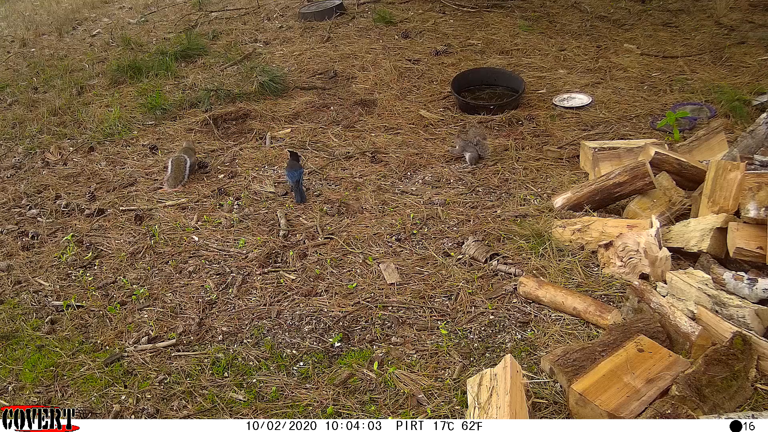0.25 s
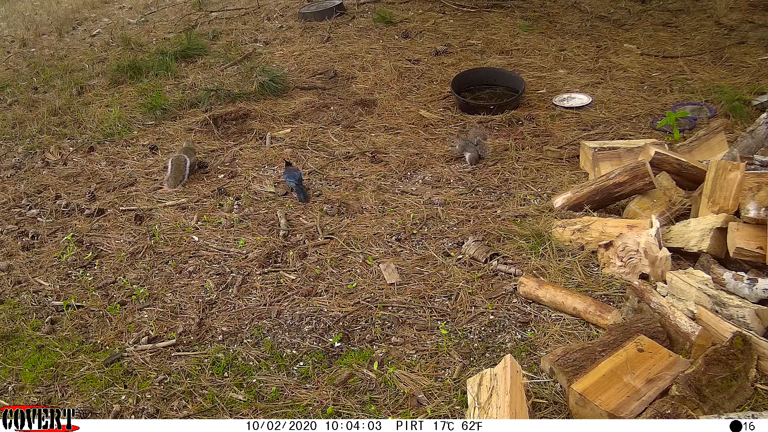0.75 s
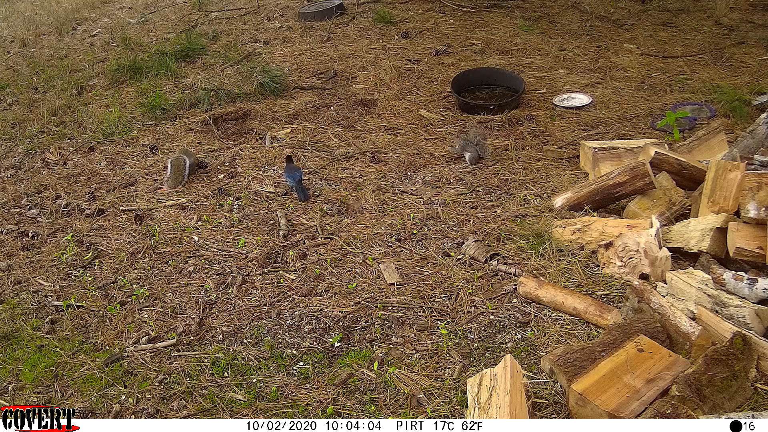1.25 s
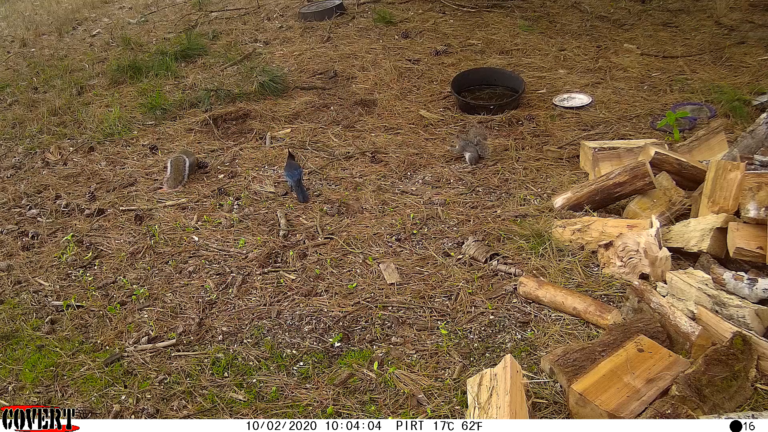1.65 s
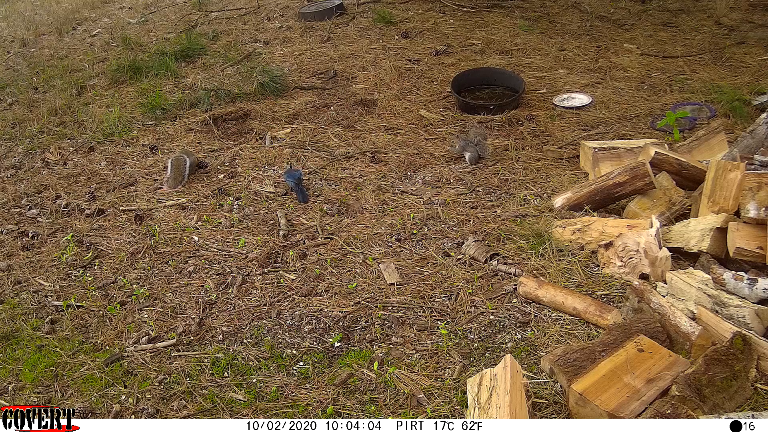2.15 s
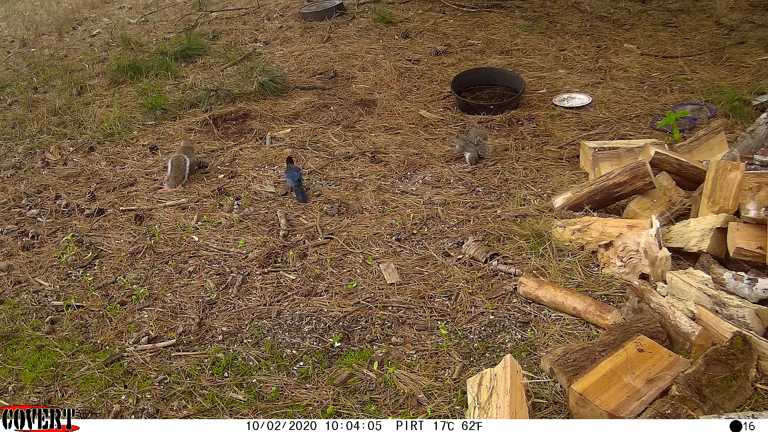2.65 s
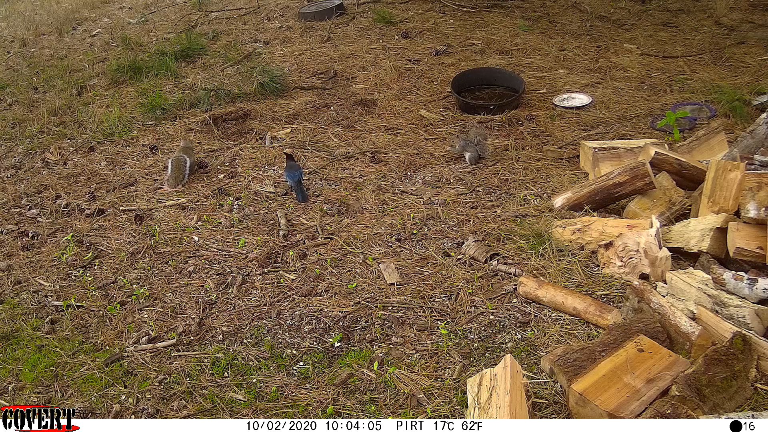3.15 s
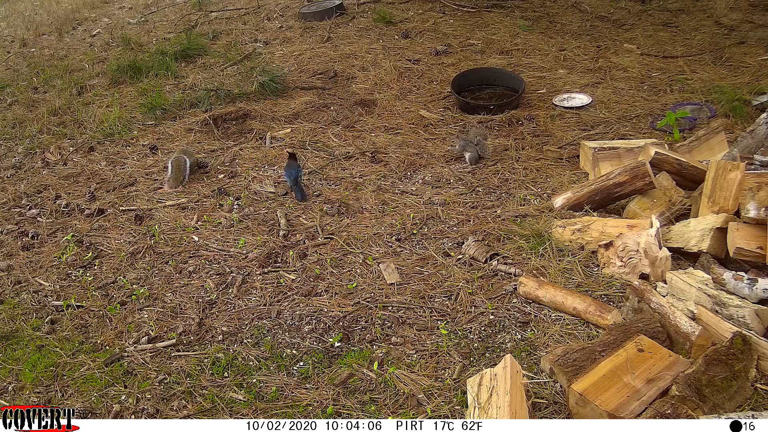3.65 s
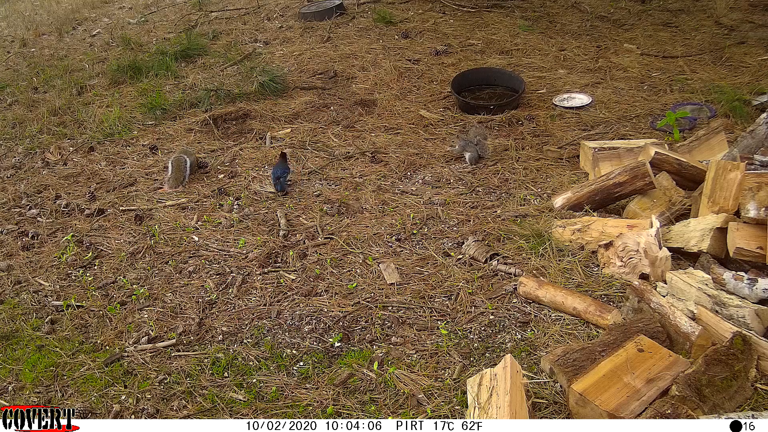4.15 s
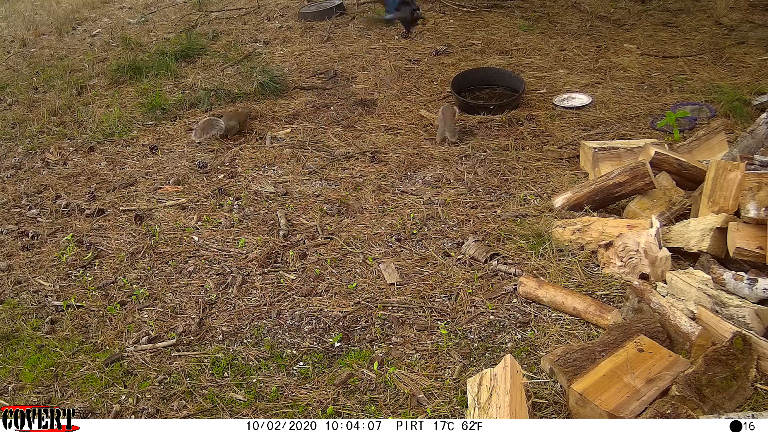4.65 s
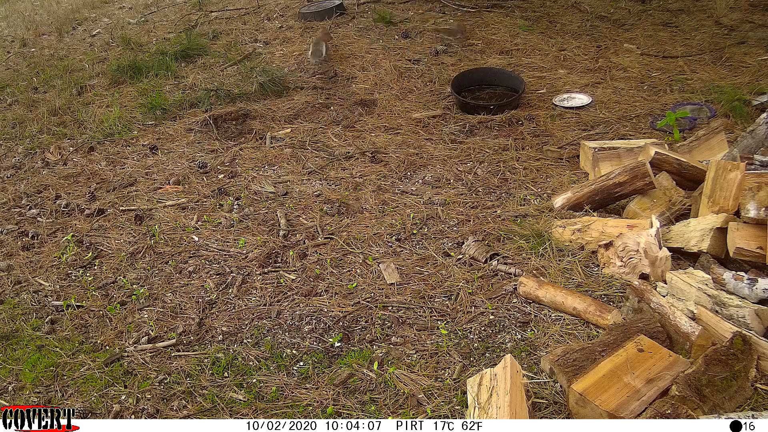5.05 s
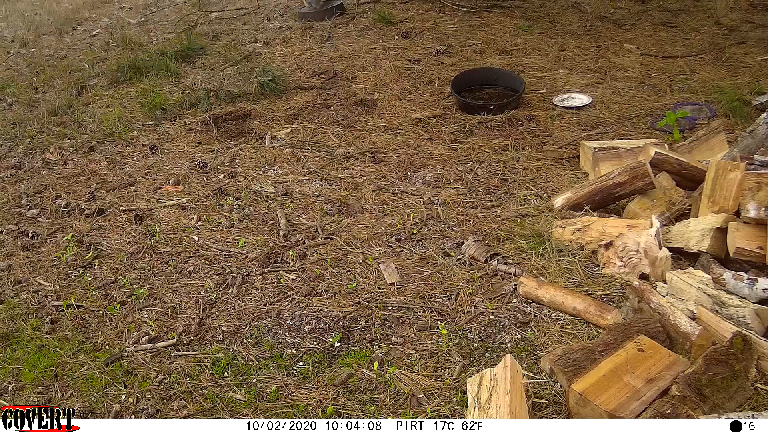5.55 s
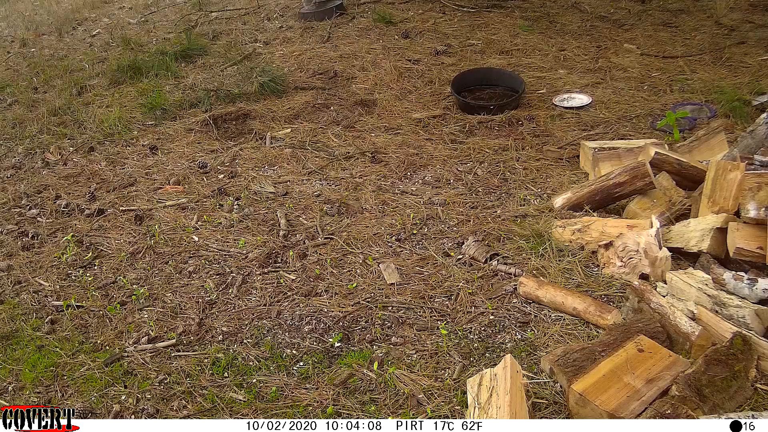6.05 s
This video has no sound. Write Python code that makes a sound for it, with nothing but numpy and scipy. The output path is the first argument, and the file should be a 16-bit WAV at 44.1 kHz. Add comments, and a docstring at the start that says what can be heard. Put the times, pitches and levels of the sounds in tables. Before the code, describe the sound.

Low hiss with faint wavering whines, heard from a small box outdoors. Distant hoarse bird calls and a thin whistle come first, then short bright chirps and tiny snaps on the ground. After a few quick mews, squawks crowd together and dry needles rush and crackle. A very close hollow thump and rapid claw scratching dominate briefly, dropping away to far calls with slight woodland echo and light rustling.

```python
"""A wooded yard, the microphone at a small box: a quiet hiss with faint wavering whines lies over everything.
Far among the trees, harsh jay calls (pulsed noise in throat resonances) and a thin whistle; nearer, arched
chirps and soft mews (phase-swept sines). Broadband hiss swells briefly, at times along with the calls. A jay
takes off and squirrels scatter: grains of noise rustle and snap in dry needles. One animal lands on the box, a
bank of decaying modes that knocks hollowly; its claws tick and scrabble. Far calls carry the most echo."""
import sys
import numpy as np
from scipy import signal
from scipy.fft import rfft, irfft, next_fast_len
from scipy.io import wavfile
from scipy.ndimage import uniform_filter1d

SR = 44100
rng = np.random.default_rng(int(sys.argv[2]) if len(sys.argv) > 2 else 0)


def to_wav(sig):
    """Store sig (one row per channel, or 1-D mono) as 16-bit WAV at the path in sys.argv[1].

    Samples outside -1..1 are clipped; the rate is SR.
    """
    pcm = np.clip(np.atleast_2d(sig), -1, 1) * 32767
    pcm = np.round(pcm).astype(np.int16)
    wavfile.write(sys.argv[1], SR, pcm.T)  # frames by channels


N = 277389
TIME = np.arange(N) / SR


def from_db(db):
    """Decibels to amplitude."""
    return 10 ** (np.asarray(db) / 20)


def rms_one(x):
    """Scale a signal to rms 1."""
    return x / np.sqrt(np.mean(x ** 2) + 1e-20)


def noise():
    """White noise for the whole scene."""
    return rng.standard_normal(N)


def level(rows):
    """Gain along a (t/s, level/dB) curve: practically silent before it, held after it."""
    s, db = np.transpose(rows)
    return from_db(np.interp(TIME, s, db, left=-140))


def add(out, start, sound):
    """Mix a sound in at a time in seconds, cut at the scene's edges."""
    at = int(round(start * SR))
    sound, at = sound[max(-at, 0):], max(at, 0)
    out[at:at + len(sound)] += sound[:max(N - at, 0)]


def colour(x, spectrum):
    """Filter a signal by a smooth (f/Hz, level/dB) curve; rms 1."""
    hz, db = np.transpose(spectrum)
    size = next_fast_len(len(x))
    f = np.fft.rfftfreq(size, 1 / SR) + 1  # 1 Hz up, so that the logarithm exists
    gain = from_db(np.interp(np.log(f), np.log(hz), db))
    return rms_one(irfft(rfft(x, size) * gain, size)[:len(x)])


def drift(rate):
    """Random wander through this many chance points a second, joined by lines; rms 1."""
    return rms_one(np.interp(TIME * rate, np.arange(40000), rng.standard_normal(40000)))


def resonate(x, hz, width_hz):
    """A two-pole resonance with unit gain on top."""
    r = np.exp(-np.pi * width_hz / SR)
    zeros = np.array([1, 0, -1]) * (1 - r * r) / 2
    poles = [1, -2 * r * np.cos(2 * np.pi * hz / SR), r * r]
    return signal.lfilter(zeros, poles, x)


def swell(u, edge):
    """A rounded rise and fall as u runs from 0 to 1; edge is the share of each slope."""
    return np.sin(np.pi / 2 * np.clip(np.minimum(u, 1 - u) / edge, 0, 1))


def during(start, length):
    """The samples that a call covers, and its progress from 0 to 1."""
    at = np.flatnonzero((TIME >= start) & (TIME < start + length))
    return at, (TIME[at] - start) / length


def sweep(hz):
    """Phase in radians of a tone that follows a pitch curve in Hz."""
    return 2 * np.pi * np.cumsum(hz) / SR


def grains(per_s, spread_db, smooth):
    """Tiny fractures of uneven size over a smooth friction hiss."""
    sizes = from_db(spread_db * np.minimum(rng.exponential(1, N), 4)) * rng.choice([-1, 1], N)
    return rms_one(sizes * (rng.random(N) < per_s / SR)) + smooth * noise()


# Spectrum of the steady hiss at the microphone: (f/Hz, level/dB)
HISS_SPECTRUM = [(15, -8), (30, -1.5), (60, -2.5), (137, -10.5), (400, -15.5), (750, -21), (1100, -13.5),
                 (1500, -19), (2200, -24.5), (3500, -26.5), (4200, -31), (5000, -28), (14000, -27.5),
                 (15800, -31.5)]
# Faint narrow whines in the hiss: (f/Hz, width/Hz, mean level/dB)
WHINES = [(4174, 180, -84), (6660, 360, -86.5), (8980, 200, -90)]
# Spectrum of the low lumps of air: (f/Hz, level/dB)
BUFFET_SPECTRUM = [(15, 0.5), (26, 1.5), (38, -4.5), (55, 0.5), (70, -6.5), (100, -12.5), (150, -22.5),
                   (260, -23), (500, -39), (1500, -92)]


def air(activity, hiss_db=-67, whine_flicker_db=3, calm_db=-73, gust_db=2.5,
        draught_db=-7.5, draught_power=0.79, smooth_s=0.13, lag_s=0.01):
    """Steady hiss, wavering whines, and low lumps that follow the rustle and drag levels by a power law."""
    hiss = from_db(hiss_db) * colour(noise(), HISS_SPECTRUM)
    whines = np.zeros(N)
    for hz, width_hz, db in WHINES:
        flicker = from_db(db + whine_flicker_db * drift(6.2))
        whines += flicker * rms_one(resonate(noise(), hz, width_hz))
    push = np.interp(TIME - lag_s, TIME, uniform_filter1d(activity, int(smooth_s * SR)))
    draught = from_db(draught_db) * np.abs(push) ** draught_power
    buffet = np.hypot(from_db(calm_db), draught) * from_db(gust_db * drift(7.3))
    return hiss + whines + buffet * colour(noise(), BUFFET_SPECTRUM)


# Harsh far calls: (t/s, length/s, main resonance f/Hz, its width/Hz, level/dB before the swell)
SQUAWKS = [(-.1, 0.22, 1140, 260, -74.5), (0.363, 0.33, 1130, 260, -68), (0.972, 0.25, 1115, 224, -62),
           (1.616, 0.45, 1095, 330, -70), (4.187, 0.25, 944, 151, -59.5), (4.441, 0.047, 1110, 149, -52.5),
           (4.555, 0.18, 1180, 397, -53), (4.705, 0.194, 1100, 376, -51.5), (5.039, 0.13, 1160, 400, -57.5),
           (5.487, 0.31, 1107, 272, -56.5), (5.775, 0.24, 1165, 404, -68.5), (6.02, 0.34, 1130, 238, -57)]
# Throat resonances: (multiple of the main f, multiple of its width, level/dB)
THROAT = [(1.001, 1, 8.5), (1.29, 1.5, 3), (1.4, .9, -42)]


def squawks(rasp_hz=95, rasp_depth=0.29, edge=0.39):
    """Hoarse calls: unevenly pulsed air through the throat resonances."""
    out = np.zeros(N)
    pulses = 1 + rasp_depth * np.sin(sweep(rasp_hz * (1 + 0.23 * drift(60))))
    breath = pulses * noise()
    for start, length, hz, width_hz, db in SQUAWKS:
        at, u = during(start, length)
        voice = 0
        for ratio, wider, gain_db in THROAT:
            # two passes make the skirts steeper
            once = resonate(breath[at], hz * ratio, width_hz * wider)
            twice = resonate(once, hz * ratio, width_hz * wider)
            voice = voice + from_db(gain_db) * rms_one(twice)
        out[at] += from_db(db) * swell(u, edge) * rms_one(voice)
    return out


# Notes of a far thin whistle: (t/s, length/s, top f/Hz, level/dB before the flutter)
WHISTLE = [(0.134, 0.2, 1680, -75), (.55, 0.32, 1812, -72), (0.867, 0.748, 1684, -66.5)]


def whistle(sag=0.033, waver=0.0048, flutter_db=4.0, edge=0.44):
    """Long, nearly pure, slightly arched notes that flutter on their way through the trees."""
    out, jitter, flutter = np.zeros(N), drift(150), from_db(flutter_db * drift(44.9))
    for start, length, hz, db in WHISTLE:
        at, u = during(start, length)
        arch = hz * (1 - sag * (2 * u - 1) ** 2)
        phase = sweep(arch * (1 + waver * jitter[at]))
        out[at] += from_db(db) * swell(u ** 0.77, edge) * flutter[at] * np.sin(phase)
    return out


# Nearer chirps: (t/s, length/s, top f/Hz of the lower voice, share of the note at which it tops,
# level/dB, upper voice level/dB and overtone level/dB relative to that)
CHIRPS = [(0.968, 0.038, 3500, 0.7, -65.5, -16, -18), (2.11, 0.053, 3600, 0.76, -66, -18, -7),
          (2.356, 0.08, 3410, 0.46, -56.5, -12, -27), (2.545, 0.089, 3410, 0.64, -51, -2.5, -3),
          (3.012, 0.083, 3250, 0.54, -63, -8, -22), (3.422, 0.071, 3440, 0.53, -49.5, -10, -20),
          (4.747, 0.06, 3500, 0.49, -47.5, -1, -6.5)]


def chirps(rise=0.7, fall=0.46, rough=0.021, wobble=0.012, upper_ratio=1.233, flutter_db=3.5):
    """Arched notes from both sides of a syrinx; the higher side and the overtones grow towards mid-note."""
    out, sway = np.zeros(N), 1 + wobble * drift(170)
    jitter = (drift(1300), drift(1300))
    flutter = from_db(flutter_db * np.array([drift(300), drift(200)]))
    for start, length, hz, crest, db, upper_db, overtone_db in CHIRPS:
        at, u = during(start, length)
        bend = np.where(u < crest, rise, fall) * (u - crest) ** 2
        arch = hz * sway[at] * (1 - bend)
        low, high = [sweep(arch * (1 + rough * j[at])) for j in jitter]
        high = high * upper_ratio
        push = swell(u ** 1.14, 0.54)  # effort builds slowly and lets go quickly
        overtones = np.sin(2 * low) + 0.68 * np.sin(low + high) + 0.5 * np.sin(2 * high)
        overtones += 0.21 * np.sin(3 * low) + 0.2 * np.sin(4 * low)
        lower = flutter[0, at] * np.sin(low)
        upper = from_db(upper_db) * push ** 2 * flutter[1, at] * np.sin(high)
        out[at] += from_db(db) * push * (lower + upper + from_db(overtone_db) * push * overtones)
    return out


# Brief swells of broadband hiss, some along with the calls: (peak t/s, length/s, level/dB)
HISS_SWELLS = [(1.063, .26, -69.5), (1.99, 0.27, -71.5), (2.192, 0.073, -57.5), (2.414, 0.15, -63.5),
               (2.568, .13, -62), (2.75, 0.29, -69), (3.478, 0.099, -63.5), (4.54, 0.1, -57.5),
               (5.197, 0.096, -51)]
# Rustle as the animals flee: (t/s, level/dB before flight_db is added)
FLIGHT = [(3.9, -87), (4.066, -70.5), (4.374, -65.5), (4.514, -55), (4.69, -53), (4.702, -57),
          (4.772, -51.5), (4.942, -60.5), (5.12, -60.5)]
# Rustle as they settle farther off: (t/s, level/dB before settling_db is added)
SETTLING = [(5.64, -66.5), (5.992, -74.5), (6.238, -60), (6.28, -66)]


def rustle_level(flight_db=4.0, settling_db=3, idle_db=-80):
    """Strength of the rustling noise: idle feeding, the flight, and brief bell-shaped swells of hiss."""
    fleeing = [(s, db + flight_db) for s, db in FLIGHT]
    settling = [(s, db + settling_db) for s, db in SETTLING]
    flight = level(fleeing + settling)
    swells = sum(from_db(db) * np.exp(-(2 * (TIME - s) / length) ** 2) for s, length, db in HISS_SWELLS)
    return np.sqrt(flight ** 2 + swells ** 2 + from_db(idle_db) ** 2)


# Spectrum of the rustling noise: (f/Hz, level/dB)
NEEDLES = [(100, -3), (300, -2), (650, 0), (1200, 11.5), (2200, 1.5), (4200, 2), (7000, -1), (12500, -2),
           (15500, -11.5)]


def rustle(strength, flutter_db=2.5, crackle_db=-5.5):
    """Dry needles stirred by wings and feet, and the hiss swells: soft noise with clumps of sparse crackles."""
    soft = grains(per_s=3000, spread_db=3, smooth=1.0) * from_db(flutter_db * drift(60))
    crackle = grains(per_s=260, spread_db=4, smooth=0) * from_db(3 * drift(35))
    return strength * colour(soft + from_db(crackle_db) * crackle, NEEDLES)


def foraging(first_s=2.1, last_s=4.4, faintest_db=-57, tilt_db=-3.5, count=10):
    """Rows of faint snaps at chance moments while the animals feed, up to 4 dB above the faintest."""
    chances = rng.random((count, 2))
    return [(first_s + (last_s - first_s) * when, faintest_db + 4 * size, tilt_db) for when, size in chances]


# Needles and twigs snapping on the ground: (t/s, peak level/dB, brightness/dB per octave)
SNAPS = [(2.638, -50, -1), (3.147, -55, 4.5), (3.267, -55, 0), (3.313, -53.5, -2), (3.6865, -53, 2.5),
         (3.74, -47, -1), (3.813, -49, -1.5), (4.63, -36, 1), (4.84, -35, 4), (5.016, -38.5, 4),
         (5.098, -35, -2), (5.757, -48, 0.5), (6.075, -47, 3), (6.162, -45, -1)]
# Claws striking the box: (t/s, peak level/dB, brightness/dB per octave)
CLAW_TICKS = [(5.1386, -25, 11.5), (5.272, -27.5, 0.5), (5.3402, -20, -1.5), (5.35, -24, 1),
              (5.3562, -23.5, 10), (5.393, -19.5, 11.5), (5.398, -23, -4), (5.416, -21.5, 1.5),
              (5.43, -24, -3), (5.4458, -19, 6.5), (5.455, -22, 1), (5.499, -24.5, 3), (5.625, -44, -1)]
# Spectrum of claw contact, also the base colour of the snaps: (f/Hz, level/dB)
CLAWS = [(150, 0), (500, 5.5), (760, -10.5), (1250, 5.5), (1900, -0.5), (4200, -1), (5000, -2.5),
         (7000, -6), (9000, -9), (12500, -7), (15500, -20)]


def ticks(rows, t60, tail_t60=0.073, tail_db=-19, patchy_db=3):
    """Each tick is a short crack with a little tail (t60 in s), coloured by the spot that is struck."""
    out, t, hz = np.zeros(N), TIME[:SR // 12], np.geomspace(700, 14300, num=36)
    fade = from_db(-60 * t / t60) + from_db(tail_db - 60 * t / tail_t60)
    for start, db, tilt_db in rows:
        patches = patchy_db * rng.standard_normal(len(hz))
        spot = tilt_db * np.log2(hz / 4000) + patches + np.interp(hz, *np.transpose(CLAWS))
        spectrum = [(300, -20), *zip(hz, spot), (16000, -20)]
        crack = colour(rng.standard_normal(len(t)), spectrum) * fade
        add(out, start, from_db(db) * crack / np.abs(crack).max())
    return out


# Soft mews before the take-off: (t/s, length/s, top f/Hz, level/dB)
MEWS = [(4.16, 0.046, 1785, -58.5), (4.208, 0.051, 1920, -63), (4.267, 0.037, 2030, -56.5),
        (4.316, 0.06, 1740, -58.5), (4.382, 0.022, 1650, -56)]


def mews(sag=0.326, rough=0.047, third_db=-11):
    """Quick low arches with a weak third harmonic."""
    out, jitter = np.zeros(N), drift(1100)
    for start, length, hz, db in MEWS:
        at, u = during(start, length)
        arch = hz * (1 - sag * (2 * u - 1) ** 2)
        phase = sweep(arch * (1 + rough * jitter[at]))
        third = from_db(third_db) * swell(u, 0.77) * np.sin(3 * phase)
        out[at] += from_db(db) * swell(u, 0.057) * (np.sin(phase) + third)
    return out


# Blows on the box: (t/s, level/dB added to every mode, brightness/dB per octave)
KNOCKS = [(5.2727, -7, 2), (5.322, -23, 5.5), (5.387, -15.5, 3), (5.4, -20.5, 11.5), (5.41, -22, 7.5),
          (5.482, -37, -5), (5.503, -35, 2), (5.634, -48, 1), (5.656, -45.5, -4.5), (5.757, -58, -3),
          (5.92, -54, 1.5)]
# Modes of the hollow box: (f/Hz, level/dB, t60/s)
BOX = [(174.5, -23.5, 0.2), (240, -22.5, 0.15), (317, -17, 0.13), (383.6, -7, 0.12), (495, -16, 0.12),
       (552, 0.5, 0.088), (585, -7, 0.063), (678, -16, 0.071), (794, -6.5, 0.035), (843, 5, 0.047),
       (945.5, -11.5, 0.091), (988, -3.5, 0.048), (1283, -14, 0.044)]


def knocks(press_s=0.0061, uneven_db=0.7):
    """A padded foot loads the box over a few milliseconds; its modes swell and die away."""
    out, t = np.zeros(N), TIME[:SR // 4]
    hz, mode_db, t60 = np.transpose(BOX)[:, :, None]
    loading = 1 - np.exp(-(t / press_s) ** 2)
    for start, db, tilt_db in KNOCKS:
        strength, lag = rng.standard_normal((2, len(BOX), 1))
        blow_db = db + mode_db + tilt_db * np.log2(hz / 600) + uneven_db * strength
        rings = from_db(blow_db - 60 * t / t60) * np.sin(2 * np.pi * hz * t + 0.69 * lag)
        add(out, start, rings.sum(axis=0) * loading)
    return out


def drag(start_s=5.342, end_s=5.5, hold_db=-41, attack_db_per_s=597, release_db_per_s=197):
    """How hard the claws drag over the box: a quick grip, a hold, a slower slide off."""
    early, late = np.maximum(start_s - TIME, 0), np.maximum(TIME - end_s, 0)
    drop_db = attack_db_per_s * early + release_db_per_s * late
    return from_db(hold_db - np.minimum(drop_db, 100))


def scrabble(grip, slip_db=2.0, catch_db=-3, body_db=-10):
    """Claws slide on the box and catch in coarse slips, which also stir its modes."""
    catches = grains(per_s=330, spread_db=3, smooth=0)
    burst = rng.standard_normal(64) * np.exp(-np.arange(64) / 14)  # each catch is a tiny noise burst
    catches = rms_one(signal.fftconvolve(catches, burst)[:N])
    slide = grains(per_s=1900, spread_db=4.0, smooth=0.93) * from_db(slip_db * drift(170))
    force = rms_one(slide + from_db(catch_db) * catches)
    body = np.zeros(N)
    for hz, db, t60 in BOX:
        width_hz = np.log(1000) / (np.pi * t60)
        body += from_db(db / 2) * resonate(force, hz, width_hz)  # modes at half their dB contrast
    return grip * (colour(force, CLAWS) + from_db(body_db) * rms_one(body))


def woods(x, t60=0.14):
    """Scattered echoes from trunks and ground: decaying noise that starts after 6 ms."""
    t = TIME[:SR // 2]
    echoes = rng.standard_normal(len(t)) * from_db(-60 * t / t60) * (t > 0.006)
    return signal.fftconvolve(x, echoes / np.linalg.norm(echoes))[:N]


def scene(far_echo_db=-12, near_echo_db=-18, contact_echo_db=-32):
    """Birds among the trees, animals on the ground and on the box; far calls carry the most echo."""
    far = squawks() + whistle()
    near = chirps() + mews()
    strength, grip = rustle_level(), drag()
    snaps = ticks(list(SNAPS) + foraging(), t60=0.025)
    claws = ticks(CLAW_TICKS, t60=0.014) + scrabble(grip)
    contacts = snaps + knocks() + claws
    sent = from_db(far_echo_db) * far + from_db(near_echo_db) * near + from_db(contact_echo_db) * contacts
    return (air(strength + grip) + far + near + rustle(strength) + contacts + woods(sent))[None]


def record(dry, cutoff_hz=15750):
    """The microphone channel: a steep elliptic low-pass cuts the top."""
    return signal.sosfilt(signal.ellip(10, 0.2, 80, cutoff_hz, fs=SR, output="sos"), dry)


dry = scene()
out = record(dry)
to_wav(out)
```